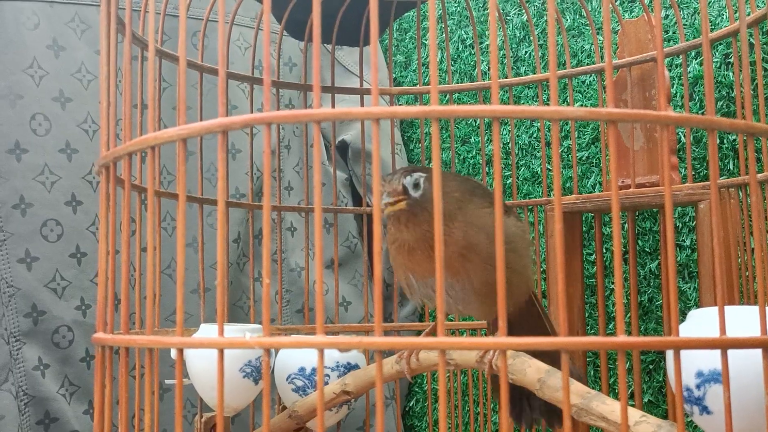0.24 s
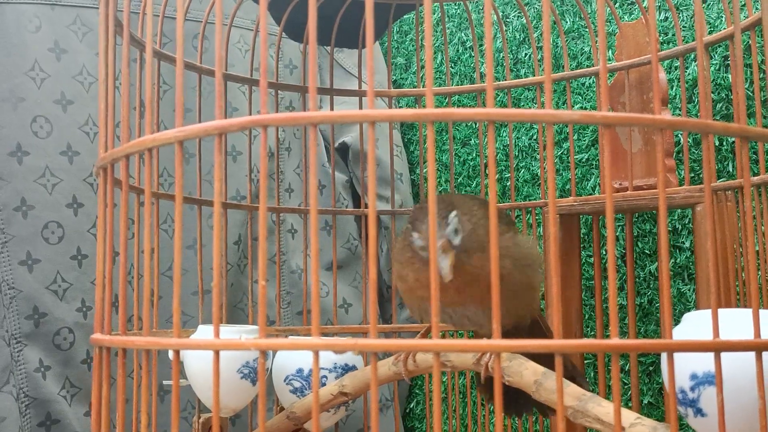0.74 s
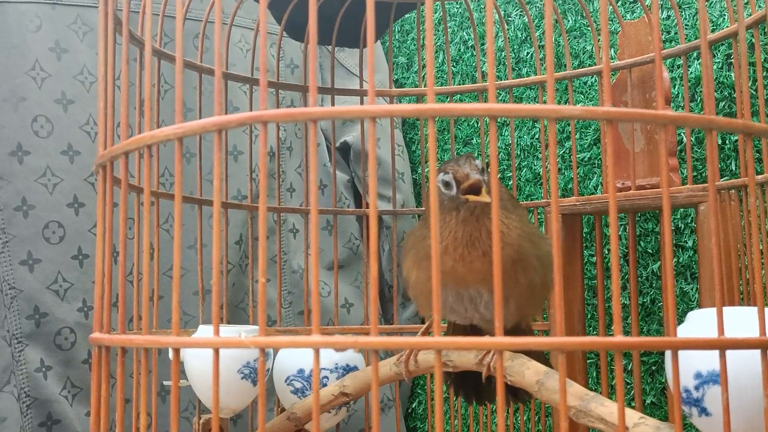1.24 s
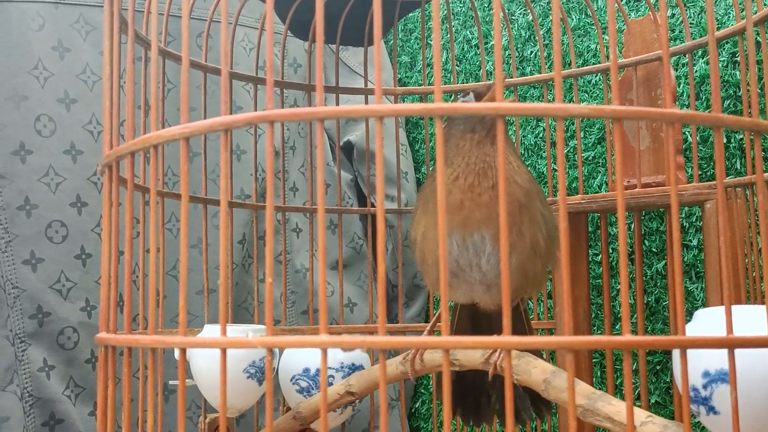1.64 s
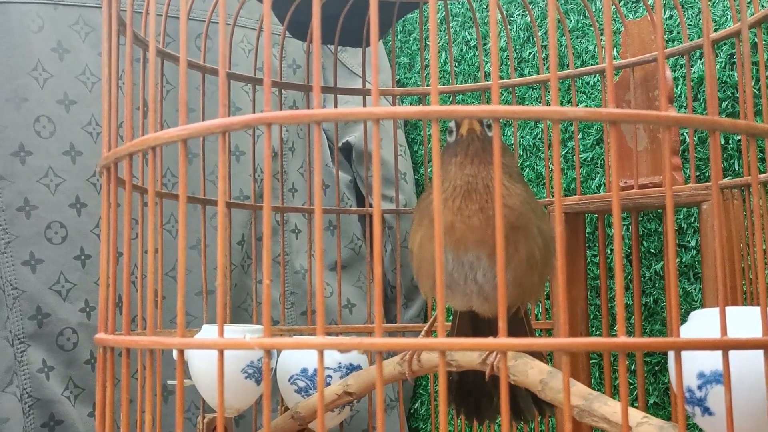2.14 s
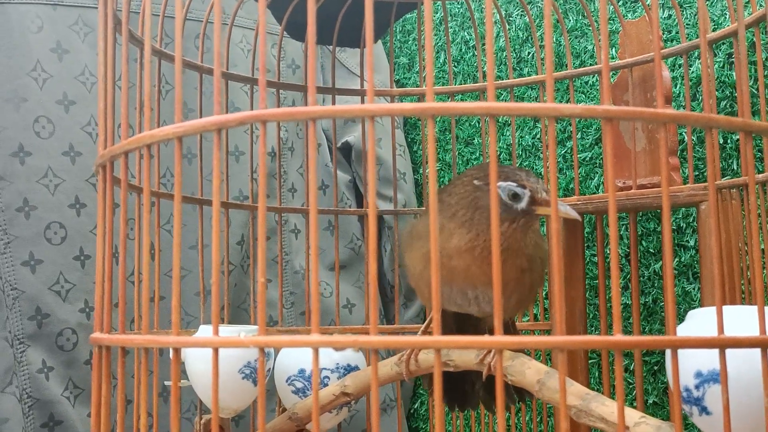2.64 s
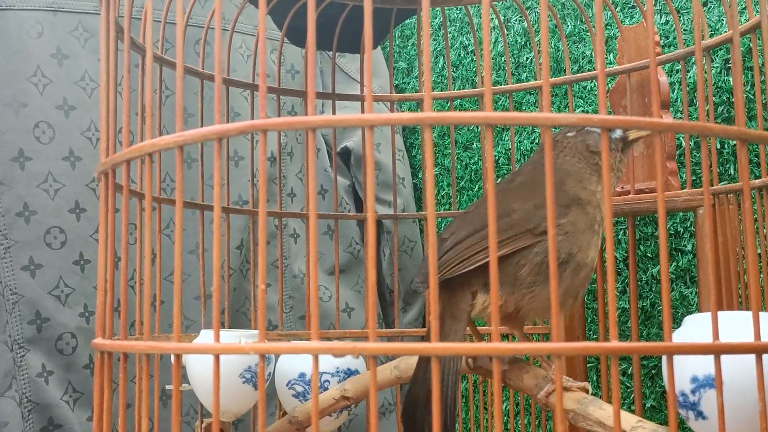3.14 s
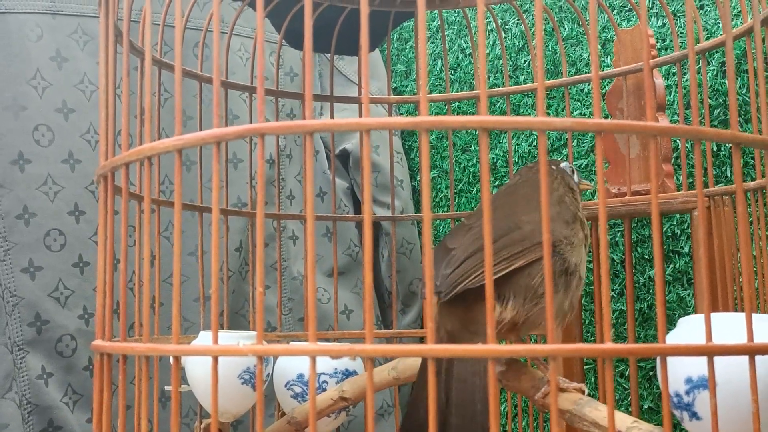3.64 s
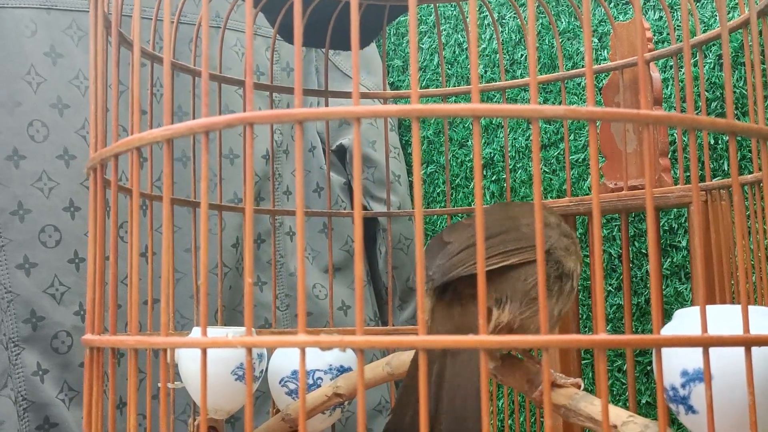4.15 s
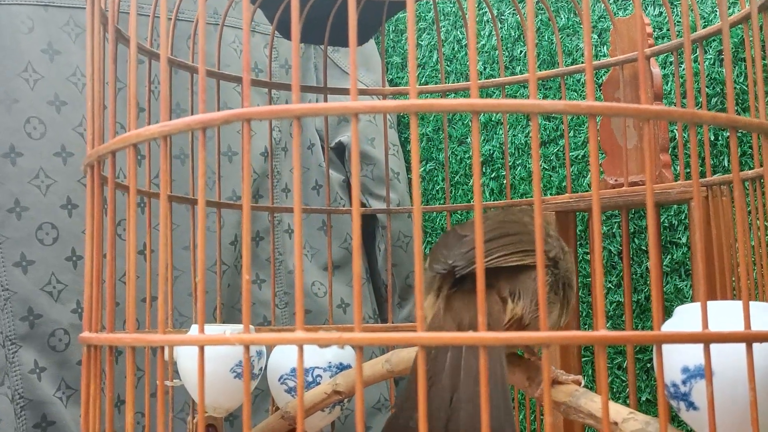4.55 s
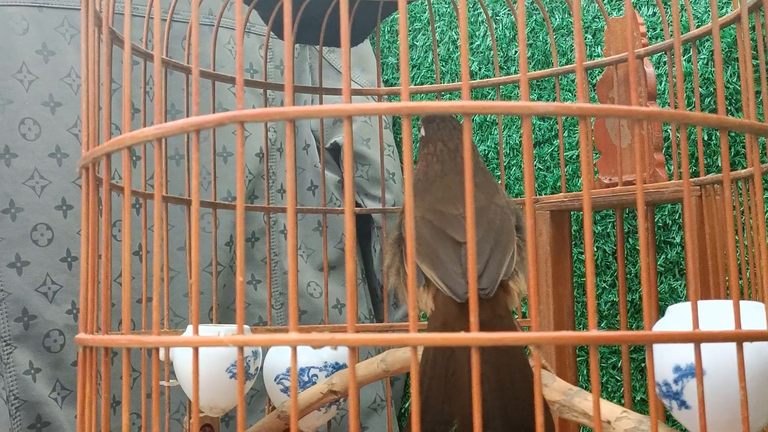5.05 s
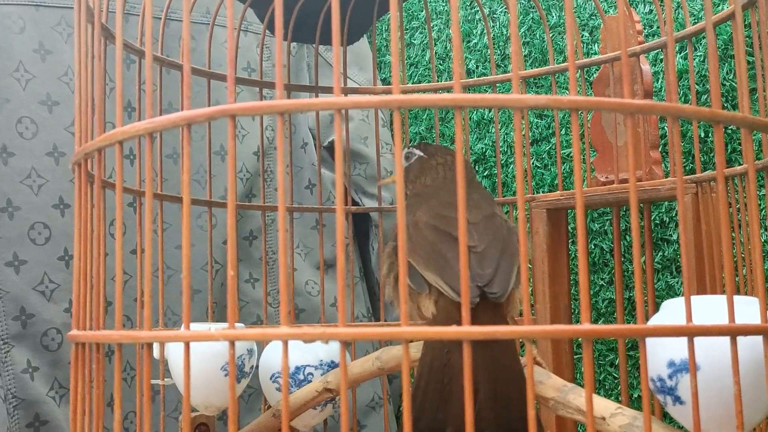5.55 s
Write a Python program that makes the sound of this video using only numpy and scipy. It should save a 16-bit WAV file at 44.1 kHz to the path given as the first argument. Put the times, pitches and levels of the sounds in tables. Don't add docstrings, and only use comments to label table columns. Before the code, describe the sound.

Close stereo bird song in a hard-walled porch with a short, bright echo. From 0 to 1.9 s, farther birds give fluttering level and falling whistles while a nearer bird throws in hooked notes and piercing downward chirps, strongest near 0.6, 1.1, 1.4 and 1.7 s. At 1.9-2.2 s comes a rapid shrill trill, then four evenly spaced dropping notes with small rising lead-ins until 3 s. Rougher rasps follow at 3.1 and 3.5 s, a growl at 4 s, a layered rising glide at 4.3 s, loud buzzes at 4.7 and 5.4 s, upward whistles near 4.9, 5.1 and 5.6 s, and a steadier note from 5.8 s. Claws click on wire and perch, sharply at 0.34, 3.45 and 4.4 s. Hens cluck and squawk hoarsely behind, notably at 0.4, 1.5, 4, 4.4 and 5.7 s. Faint distant twitter and soft traffic rumble continue underneath.

```python
import sys
import numpy as np
from scipy import signal
from scipy.fft import rfft, irfft
from scipy.io import wavfile
from scipy.ndimage import uniform_filter1d, minimum_filter1d

SR = 44100
rng = np.random.default_rng(int(sys.argv[2]) if len(sys.argv) > 2 else 0)


def makeup_ratio(level_db):
    decades = np.asarray(level_db, float) / 20
    return 10 ** decades


def wav_out(sig):
    wavfile.write(sys.argv[1], SR, np.round(np.clip(np.atleast_2d(sig).T, -1, 1) * 32767).astype(np.int16))


N = 255780
RUMBLE_DB = -58.5
HEN_HALF_DB = -21
USUAL_PAN_DB = -4

# (frequency [Hz], level [dB]); noise levels are per Hz
RUMBLE = [(20, -22), (105, 0), (170, -7), (300, -3), (600, -2), (2500, -7), (15000, -42)]
SWELL_BAND = [(20, -25), (60, -6), (100, 0), (130, -8), (200, -40)]
TWITTER = [(1500, -30), (2500, -3), (3800, 0), (5000, -9), (7000, -11), (10500, -20), (12500, -40),
           (15000, -55)]
HEN_THROAT = [(290, -9), (420, -17), (620, -18), (800, -5), (950, -1), (1120, -1), (1400, -6), (2400, -26)]
OVERTONES = [(3000, -73), (6000, -35), (7600, -46), (9300, -40), (11000, -30), (12600, -36), (14300, -28),
             (15800, -44)]
BEAK = [(1500, -60), (2700, -25), (3600, 0.5), (4600, -22), (6500, -40), (8000, -70)]
SHEEN = [(3000, -60), (5500, -36), (7600, -30), (9000, -36), (10500, -33), (12500, -41), (15800, -50)]
# (time [s], level [dB])
SWELL_DB = [(0, -72), (.15, -65), (.7, -68), (.9, -80), (3.2, -80), (3.5, -71), (4.1, -76), (4.85, -66),
            (5.2, -78), (5.65, -66), (5.8, -62)]
TWITTER_DB = [(0, -44), (.5, -45), (1, -50), (2.3, -52), (2.6, -55), (3.4, -61), (4, -56), (5.8, -56)]
# (frequency [Hz], lead [rad])
PORT_LEAD = [(800, 0), (1700, .35), (2300, .9), (2900, 1.7), (3700, 3.9), (4800, 5.5), (16000, 26)]

# (time [s], length [s], first pitch [Hz], held pitch [Hz], level [dB])
SQUAWKS = [
    (0, 0.11, 417.6, 440, -42),
    (.435, 0.25, 464, 559.7, -35),
    (1.475, .25, 475, 555.3, -37.5),
    (2.265, 0.23, 437, 427.3, -51),
    (3.962, 0.27, 447.3, 558, -34.5),
    (4.42, 0.13, 466, 561.4, -34),
    (5.675, .2, 496, 575, -36.5),
]
# (time [s], peak [dB], pitch [Hz])
CLUCKS = [
    (0.234, -43, 477),
    (0.337, -40, 329),
    (1.061, -41, 368.3),
    (1.362, -41, 360.4),
    (1.835, -40.5, 456.2),
    (2.027, -47.5, 444),
    (3.756, -47.5, 340),
    (3.876, -51, 281),
    (4.342, -39, 465.4),
    (5.544, -49, 296.2),
]
# (time [s], peak [dB])
CLICKS = [(0.0525, -24), (0.1423, -14), (0.3377, -6.5), (2.119, -16), (2.474, -24), (2.5112, -20),
          (3.438, -16), (3.452, -4), (3.461, -7), (3.9057, -24.5), (4.403, -10.5)]

LEVEL = 115, 55, [(0, .94, -6), (.4, 1.0, 0), (1, 1.05, -8)]
FALL = 130, 220, [(0, 1.02, -12), (.33, 1.0, 0), (.6, .87, -3), (1, .72, -4)]
SAG = 98, 95, [(0, 1.08, 1), (.5, 1.0, 0), (1, .98, -4)]
SOAR = 180, 155, [(0, .84, -6), (.26, 1.0, 0), (.63, 1.065, -10), (1, 1.087, -6)]
TAIL = 160, 200, [(0, 1.0, 0), (1, .9, -50)]
PEEP = 130, 110, [(0, 1.08, 0), (1, 0.81, 0.0096)]
# ((flutter rate [Hz], second harmonic [dB], favoured pitch [Hz], loss [dB/octave^2]),
# [(share of length [0-1], pitch ratio [1], level [dB], flutter depth [Hz])]); last two of the head optional
CHIP = (175, -3), [(0, 1.3, -9.5, 153), (1, .95, 0.5, 152)]
SWEEP = (190, 3, 1900, 60), [(0, 1.35, -6, 200), (.4, 1.0, 0, 190), (1, .7, -10, 160)]
HOOK = (141.6, -30), [(0, 0.64, -17, 65), (.5, 1.0, 1, 79.4), (1, 1.02, -12.5, 80)]
CASCADE = (66, -18.5), [(0, .97, -13, 350), (.1, 1.0, -4.5, 352.1), (.4, .93, 0.5, 300),
           (1, .6, -10.5, 220)]
PLUNGE = (70, -16.5), [(0, 0.8, -9, 435), (.15, 1.0, -5.5, 436), (.45, .86, 3, 334), (1, 0.5, -11, 200)]
TRILL = (190, 1.5, 2500, 8), [(0, .8, -10, 90), (.3, 1.0, 0, 85), (.6, .95, 0, 85), (1, .8, -9, 90)]
DOME = (190, 2.5, 2400, 8), [(0, .84, -6, 90), (.35, 1.0, 0, 70), (.7, .97, 0, 70), (1, .86, -7, 90)]
JAG = (190, -2, 2500, 8), [(0, .9, -6, 130), (.25, 1.0, -2, 150), (.7, 1.0, 0, 170), (1, .8, -6, 170)]
RISE = (135, -13, 1850, 30), [(0, .72, -10, 200), (.6, .94, 1, 220), (1, 1.03, -9, 200)]
DROP = (150, -30), [(0, 1.04, -11, 250), (.35, 1.0, 0, 260), (.6, .86, -4, 200), (1, .56, -22, 80)]
FLECK = (150, -40), [(0, 1.0, 0, 150), (.4, 1.0, -2, 150), (1, .92, -12, 150)]
SNARL = (170, -24, 1900, 30), [(0, 1.04, -6, 300), (.4, 1.0, 0, 320), (.75, .92, -5, 300),
         (1, .8, -15, 240)]
DIVE = (30, -45), [(0, 1.42, 11.5, 23), (.35, 1.02, 1.5, 30), (1, .99, -3, 20)]
RASP = (260, -19, 1950, 60), [(0, .72, -14, 160), (.3, .9, -3.5, 210), (.55, 0.97, -1, 220),
        (.9, .95, -1, 220), (1, .85, -4, 220)]
GROWL = (160, -28.5), [(0, 0.55, -20, 100), (.18, 0.85, -1.5, 170), (.42, 0.97, -2.5, 202),
         (.8, .93, -0.5, 170), (1, 0.84, -20, 150)]
BUZZ = (140, -30), [(0, .66, -20, 60), (.25, .93, 1, 120), (.5, 0.98, -1.5, 110), (.8, .99, 1, 100),
        (1, 0.96, -6, 110)]
LIFT = (170, -30), [(0, .67, -4, 200), (.45, .79, -2, 220), (.73, 1.0, 0, 220), (1, .8, -1, 170)]
ARCH = (170, -30), [(0, .75, -6, 180), (.4, .86, 0, 200), (.7, 1.0, -4, 170), (1, .88, -6, 150)]
BURR = (170, -24), [(0, .94, -2, 260), (.45, 1.0, 2, 256), (1, .96, -5.5, 240)]
BOW = (170, -30), [(0, .94, -3, 150), (.5, 1.0, 0, 170), (1, .94, -5, 150)]
CLIMB = (125, -28.5, 1750, 6), [(0, .88, -6, 22), (.12, .95, -5, 14), (.58, 1.0, -2, 50),
         (.8, 1.18, -1, 260), (1, 1.33, -2, 340)]
MURMUR = (140, -5), [(0, 1.22, 0, 40), (.4, 1.03, 0, 40), (1, .97, -3, 40)]
BLIP = (106, -18.5), [(0, .75, -7, 30), (.5, 0.98, -1, 30), (1, .8, -8, 30)]
GLIDE = (139, -9, 2600, 40), [(0, .72, -12, 14), (.13, .62, -8, 10), (.33, .59, -17, 10),
         (.42, .86, -7, 37), (.65, .95, -6, 100), (.78, 1.07, -1, 130), (.92, 1.2, 0, 100),
         (.95, 1.38, 3, 120), (1, 1.36, -2, 120)]
DESCANT = ((140, -45), [(0, .94, 4, 80), (.45, 1.0, 0, 110), (1, 1.12, -3, 110)])

# (time [s], length [s], pitch [Hz], level [dB], left-right [dB] where not usual)
LEVELS = [
    (0, 0.24, 2241, -23.5),
    (0.659, 0.18, 2330, -19.5, 1.5),
    (1.28, .17, 2320, -20.5),
    (2.694, 0.1, 2308, -21),
]
FALLS = [
    (.195, 0.17, 3292, -18.5),
    (0.829, 0.11, 3367, -15),
    (1.47, 0.12, 3258, -17),
]
SAGS = [
    (.94, 0.14, 2300, -24),
    (1.58, 0.14, 2364, -23.5),
    (2.251, .172, 2600, -23),
]
SOARS = [
    (1.93, .27, 3475, -18),
]
TAILS = [
    (0, 0.04, 1950, -20),
    (0, .045, 1480, -30),
    (0, .035, 2750, -32),
    (1.836, 0.037, 3540, -12),
]
PEEPS = [
    (.14, .03, 3150, -30),
    (.145, .025, 2050, -30),
    (.512, .018, 4200, -32),
    (2.92, 0.12, 3870, -37),
    (5.29, 0.054, 3680, -29.5),
    (5.585, 0.055, 3600, -30, 4),
]
CHIPS = [
    (0.128, 0.017, 1226, -23, 3.5),
    (0.509, 0.026, 1266, -18.5, 1),
    (0.715, 0.015, 1286, -21.5, 0),
    (1.352, 0.013, 1187, -23.5, 3),
    (1.768, 0.014, 1160, -28.5, 11),
]
SWEEPS = [
    (.915, .035, 1873, -17, -7),
    (1.229, 0.038, 2064, -19, -16.5),
    (1.535, .045, 2003, -19, -16),
    (1.88, 0.054, 2250, -15, -9.5),
]
HOOKS = [
    (0.386, .047, 2360, -11.5, -3.5),
    (.62, .065, 2500, -7, -4.5),
]
CASCADES = [
    (1.085, 0.096, 4310, -5.5, -4),
    (1.379, .1, 4348, -3.5, -1),
    (1.719, .11, 4317, -7.5, -3.7),
]
PLUNGES = [
    (0.544, .062, 4150, -11.5, -8),
    (.77, .09, 4230, -9.5, -4.5),
]
TRILLS = [
    (1.978, 0.034, 2700, -12.5, -5.5),
    (2.127, 0.038, 2660, -12, -12),
]
DOMES = [
    (2.033, 0.03, 2560, -12, -8.5),
    (2.079, .034, 2530, -8, -2.5),
]
JAGS = [
    (2.172, 0.047, 2680, -12, -12),
    (2.175, .035, 3850, -24, -5),
]
RISES = [
    (2.101, 0.049, 1913, -27),
    (2.326, 0.04, 1780, -21.5),
    (2.545, 0.042, 1937, -19.5),
    (2.775, .047, 1912, -20.5),
    (3.001, 0.069, 1914, -21.5),
]
DROPS = [
    (.305, .06, 1900, -19),
    (2.215, 0.032, 2500, -9),
    (2.425, 0.042, 2480, -10, -7),
    (2.646, .047, 2500, -11, -8),
    (2.875, 0.048, 2450, -10, -8.5),
]
FLECKS = [
    (2.425, .05, 3220, -23),
    (2.648, .05, 3220, -23),
    (2.875, .05, 3200, -22),
]
SNARLS = [
    (3.27, .082, 2050, -18),
    (3.403, .048, 2400, -11, -6),
]
DIVES = [
    (5.335, .062, 2385, -22, -11.5),
    (5.765, .9, 2410, -17, -10),
]
RASPS = [
    (3.079, .14, 2170, -14),
    (3.5, .19, 2180, -11),
]
GROWLS = [
    (4.01, .25, 2326, -10.5),
]
BUZZES = [
    (4.669, .18, 2330, -4.1, 1),
    (5.36, .175, 2294, -5.3, -0.11),
]
LIFTS = [
    (3.786, .14, 2750, -13),
    (4.852, .08, 2760, -16, -9.5),
]
ARCHES = [
    (4.31, .095, 2760, -12, -.5),
    (4.583, .095, 2740, -12),
]
BURRS = [
    (3.925, .07, 2380, -12),
    (4.95, 0.091, 2300, -19, 4),
]
BOWS = [
    (4.41, .1, 2260, -12, -.5),
]
CLIMBS = [
    (4.915, 0.16, 2763, -6, -7),
    (5.12, 0.16, 2784, -5, -2),
    (5.57, .145, 2769, -4, -2),
]
MURMURS = [
    (3.22, .022, 1380, -26, -8),
    (3.252, .02, 1330, -29, -8),
    (3.692, 0.028, 1390, -27, -5.5),
    (3.726, .018, 1370, -28, -5.5),
    (3.752, .033, 1340, -29, -5.5),
]
BLIPS = [
    (3.244, 0.0091, 2210, -15.5, -8),
    (3.718, 0.0086, 2310, -12.5, -11.5),
    (3.744, 0.0072, 2057, -15.5, -11),
    (3.761, .008, 1970, -21, -10),
]
GLIDES = [
    (4.294, .27, 2823, -12, -13),
]
DESCANTS = [
    (4.41, .11, 3957, -24.5, -10),
]


def at_hz(points, hz):
    table_hz, table_db = np.transpose(points)
    return np.interp(np.log(hz), np.log(table_hz), table_db)


def coloured(white, spectrum):
    hz = np.maximum(np.fft.rfftfreq(white.shape[-1], 1 / SR), 10)
    noise = irfft(rfft(white) * makeup_ratio(at_hz(spectrum, hz)), white.shape[-1])
    return noise / noise.std()


def wander(count, hz):
    r = np.exp(-2 * np.pi * hz / SR)
    slow = signal.lfilter([1], [1, -2 * r, r * r], rng.standard_normal(count + 3000))[3000:]
    return slow / np.sqrt((1 + r * r) / (1 - r * r) ** 3)


def add(out, start_s, sound, pan_db):
    i = round(start_s * SR)
    sound = sound[max(-i, 0):N - i]
    first = max(i, 0)
    out[:, first:first + len(sound)] += sound * makeup_ratio(np.array([[pan_db / 2], [-pan_db / 2]]))


def rumble():
    air = coloured(rng.standard_normal(N) + .6 * rng.standard_normal((2, N)), RUMBLE)
    traffic = coloured(rng.standard_normal(N) + .4 * rng.standard_normal((2, N)), SWELL_BAND)
    swell_db = np.interp(np.arange(N) / SR, *np.transpose(SWELL_DB))
    return makeup_ratio(RUMBLE_DB) * air + makeup_ratio(swell_db) * traffic


def twitter():
    level_db = np.interp(np.arange(N) / SR, *np.transpose(TWITTER_DB)) + 3 * wander(N, 8)
    return makeup_ratio(level_db) * coloured(rng.standard_normal((2, N)), TWITTER)


def hen_call(length_s, first_hz, held_hz, db, rough):
    t = np.arange(0, length_s, 1 / SR)
    pitch_hz = held_hz + (first_hz - held_hz) * np.exp(-t / 0.033)
    phase = 2 * np.pi * np.cumsum(pitch_hz * (1 + .025 * wander(len(t), 25))) / SR
    stack = np.zeros(len(t))
    for k in range(1, 7):
        stack += makeup_ratio(at_hz(HEN_THROAT, k * held_hz)) * np.sin(k * phase)
    for k in (1, 3, 5):
        stack += makeup_ratio(HEN_HALF_DB + at_hz(HEN_THROAT, k * held_hz / 2)) * np.sin(k * phase / 2)
    fade = np.clip(np.minimum(t / .012, (length_s - t) / .04), 0, 1)
    level = makeup_ratio(db + 3 * wander(len(t), 15))
    return level * fade * stack * (1 + rough * wander(len(t), 200))


def hens():
    out = np.zeros((2, N))
    for s, length_s, first_hz, held_hz, db in SQUAWKS:
        add(out, s, hen_call(length_s, first_hz, held_hz, db, rough=.4), pan_db=-1)
    for s, db, hz in CLUCKS:
        add(out, s, hen_call(.075, 1.1 * hz, hz, db, rough=.7), pan_db=-1)
    return out


def whistle(s, hz, db, depth_hz, rate_hz, second_db, hiss_db, throb, rough,
            throat_hz=1750, narrow_db=7.9, breath=OVERTONES):
    t = np.arange(s[0] - .004, s[-1] + 0.0051, 1 / SR)
    count = len(t)
    fade = np.clip(np.minimum((t - t[0]) / .006, (t[-1] - t) / .007), 0, 1) ** 2

    beat = 2 * np.pi * np.cumsum(rate_hz * (1 + rough * rate_hz / 900 * wander(count, 25))) / SR
    depth = np.interp(t, s, depth_hz)
    swing = -np.cos(beat) - .25 * np.cos(2 * beat)
    pitch_hz = np.interp(t, s, hz) + depth * (swing + rough * wander(count, 250))
    pitch_hz = 100 * np.logaddexp(pitch_hz / 100, 12)
    phase = 2 * np.pi * np.cumsum(pitch_hz) / SR

    share = np.clip(throb * abs(depth) / 300, 0, .9)
    level = makeup_ratio(np.interp(t, s, db) + 1.2 * wander(count, 40))
    level *= (1 + share * np.cos(beat + 2.524)) / np.sqrt(1 + share ** 2 / 2)
    hoarse = abs(depth) * rate_hz / 50000

    throat_loss_db = narrow_db * np.log2(pitch_hz / throat_hz) ** 2
    tone = np.sin(phase) + makeup_ratio(second_db - throat_loss_db) * np.sin(2 * phase)
    hiss = abs(depth) * rate_hz ** 2 / 11300000.0
    tone += makeup_ratio(hiss_db) * hiss * coloured(rng.standard_normal(count), breath)
    tone += makeup_ratio(-24) * hoarse * coloured(rng.standard_normal(count), BEAK)
    level *= makeup_ratio(2.5 * hoarse * wander(count, 120))
    for k in range(3, 9):
        faint = makeup_ratio(at_hz(OVERTONES, k * pitch_hz) + min(hiss_db, -37) + 33.5)
        faint += makeup_ratio(second_db - 10.5 * (k - 1) - throat_loss_db)
        tone += faint * (k * pitch_hz < 17000) * np.sin(k * phase + k * k)
    return t[0], np.sqrt(2) * fade * level * tone


def sing(out, syllable, events, **voice):
    (rate_hz, second_db, *throat), shape = syllable
    voice = {**voice, **dict(zip(("throat_hz", "narrow_db"), throat))}
    share, ratio, shape_db, depth_hz = np.transpose(shape)
    for s, length_s, hz, db, *pan_db in events:
        knots_s = s + length_s * np.sort(share)
        start_s, note = whistle(knots_s, hz * ratio, db + shape_db, depth_hz, rate_hz, second_db, **voice)
        add(out, start_s, note, pan_db[0] if pan_db else USUAL_PAN_DB)


def far_song():
    out = np.zeros((2, N))
    parts = [(LEVEL, LEVELS), (FALL, FALLS), (SAG, SAGS), (SOAR, SOARS), (TAIL, TAILS), (PEEP, PEEPS)]
    for (rate_hz, depth_hz, shape), events in parts:
        syllable = (rate_hz, -32), [(*row, depth_hz) for row in shape]
        sing(out, syllable, events, hiss_db=-60, throb=.5, rough=.5)
    return makeup_ratio(-3) * out


def perch():
    out = np.zeros((2, N))
    t = np.arange(0, .03, 1 / SR)
    ring = 0.19 * np.sin(2 * np.pi * 7700 * t) * np.exp(-t / 0.0022)
    for s, db in CLICKS:
        crack = np.diff(rng.standard_normal(len(t) + 2), 2) * np.exp(-t / 0.0059) * 0.084
        add(out, s, makeup_ratio(db) * (crack + ring), pan_db=2)
    return out


def near_song():
    out = np.zeros((2, N))
    # (syllable, events, throb [1], hiss [dB], roughness [1])
    shrill = [(CHIP, CHIPS, .6, -38, .3), (SWEEP, SWEEPS, .3, -28, .4), (CASCADE, CASCADES, .15, -20, .35),
              (PLUNGE, PLUNGES, .2, -20, .35), (TRILL, TRILLS, .6, -22, .25), (DOME, DOMES, .6, -22, .25),
              (JAG, JAGS, .6, -28, .35), (RISE, RISES, .35, -34, .4), (DROP, DROPS, .7, -42, .4),
              (FLECK, FLECKS, .9, -60, .6)]
    mellow = [(HOOK, HOOKS, .6, -40, .25), (SNARL, SNARLS, .4, -46, .45), (DIVE, DIVES, .51, -40, .3),
              (RASP, RASPS, .8, -33, .33), (GROWL, GROWLS, 1.3, -31, .28), (BUZZ, BUZZES, .7, -29, .22),
              (LIFT, LIFTS, 1.1, -48, .28), (ARCH, ARCHES, .8, -40, .28), (BURR, BURRS, .7, -48, .3),
              (BOW, BOWS, .7, -33, .3), (CLIMB, CLIMBS, .4, -40, .3), (MURMUR, MURMURS, .51, -40, .2),
              (BLIP, BLIPS, .51, -40, .3), (GLIDE, GLIDES, .6, -35, .25), (DESCANT, DESCANTS, .6, -35, .25)]
    for parts, breath in (shrill, SHEEN), (mellow, OVERTONES):
        for syllable, events, throb, hiss_db, rough in parts:
            sing(out, syllable, events, hiss_db=hiss_db, throb=throb, rough=rough, breath=breath)
    return out


def porch(x, t60_s, first_s):
    t = np.arange(0, .6, 1 / SR)
    echoes = rng.standard_normal((2, len(t))) * makeup_ratio(-60 * t / t60_s) * np.clip(t / first_s, 0, 1) ** 2
    echoes = signal.lfilter([1], [1, -1.3, .45], echoes)
    echoes /= np.sqrt(np.sum(echoes ** 2, axis=1, keepdims=True))
    return signal.fftconvolve(x, echoes, axes=1)[:, :N]


def highpass(x, order, cutoff_hz):
    return signal.sosfilt(signal.butter(order, cutoff_hz, "high", fs=SR, output="sos"), x)


def lead_left(near):
    hz = np.maximum(np.fft.rfftfreq(2 * N, 1 / SR), 10)
    lead_rad = np.interp(hz, *np.transpose(PORT_LEAD))
    near[1] = irfft(rfft(near[1], 2 * N) * np.exp(-1j * lead_rad), 2 * N)[:N]
    return near


def scene():
    near = highpass(near_song() + perch(), 6, 1180)
    far = makeup_ratio(-3.5) * far_song()
    yard = highpass(hens(), 4, 230)
    wet = porch(makeup_ratio(-14) * near + far, t60_s=0.33, first_s=0.0018)
    wet += porch(makeup_ratio(-3) * yard, t60_s=.25, first_s=.01)
    return lead_left(near) + far + yard + wet + rumble() + twitter()


def roll_off(x):
    return signal.sosfilt(signal.butter(12, 15850, fs=SR, output="sos"), x)


def record(dry):
    room_left = np.minimum(1, .9 / (np.abs(dry).max(axis=0) + 1e-9))
    gain = uniform_filter1d(minimum_filter1d(room_left, size=400), size=400)
    return roll_off(dry * gain)


dry = scene()
out = record(dry)
wav_out(out)
```